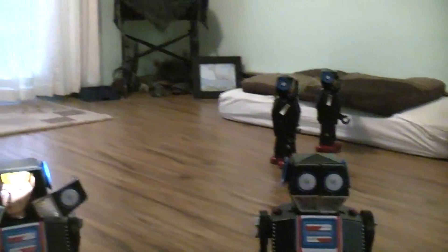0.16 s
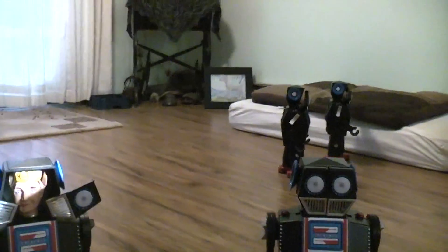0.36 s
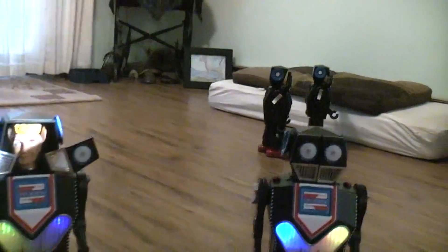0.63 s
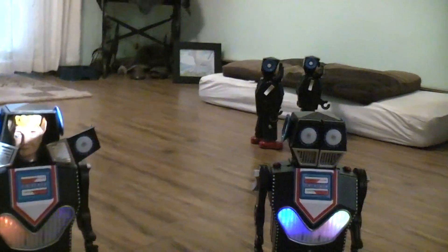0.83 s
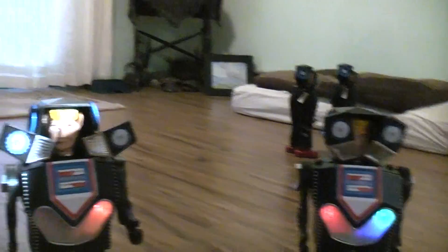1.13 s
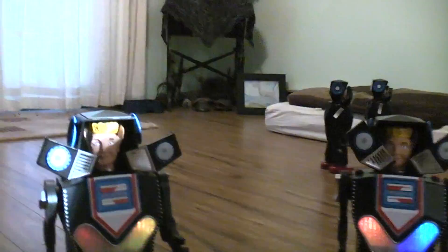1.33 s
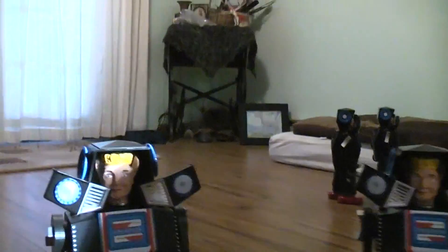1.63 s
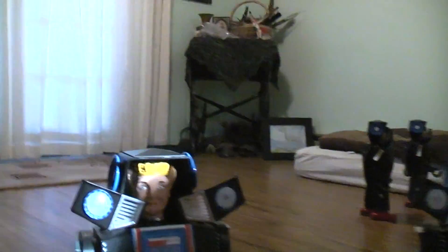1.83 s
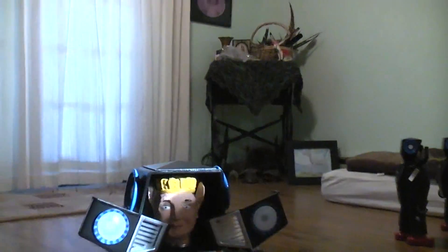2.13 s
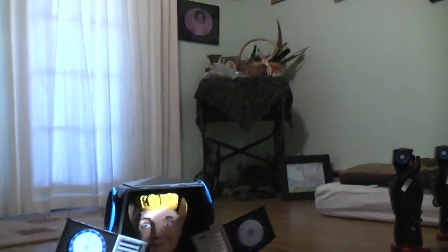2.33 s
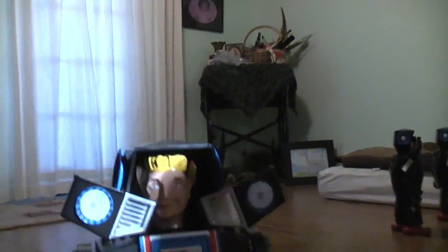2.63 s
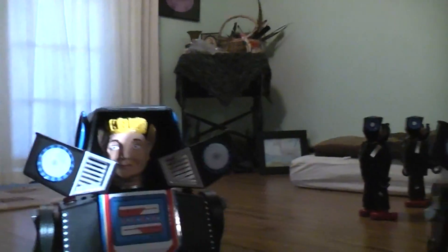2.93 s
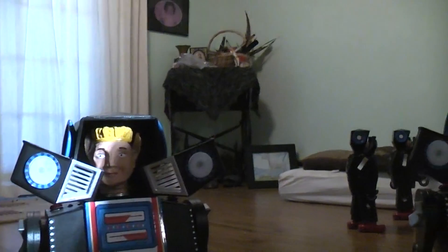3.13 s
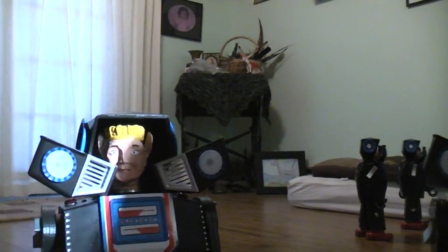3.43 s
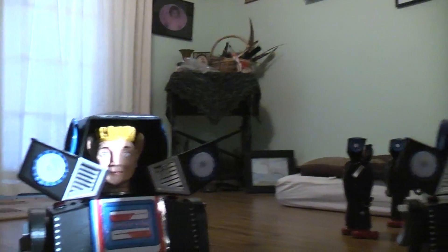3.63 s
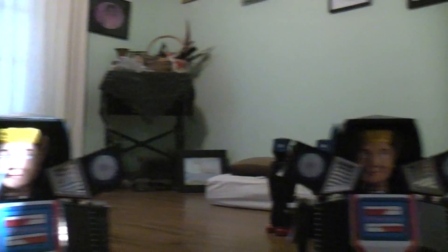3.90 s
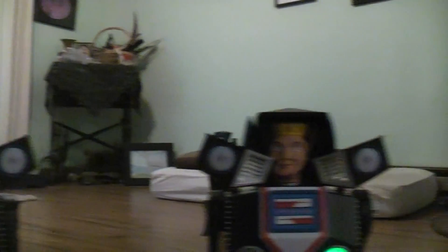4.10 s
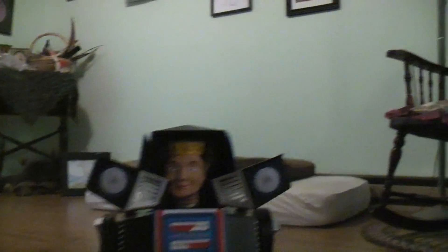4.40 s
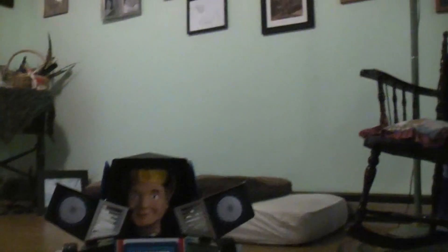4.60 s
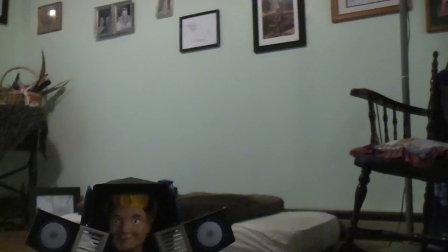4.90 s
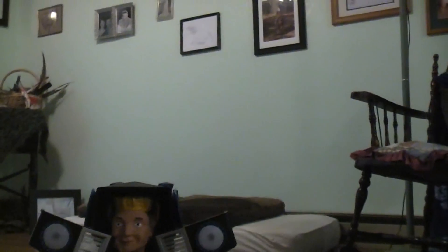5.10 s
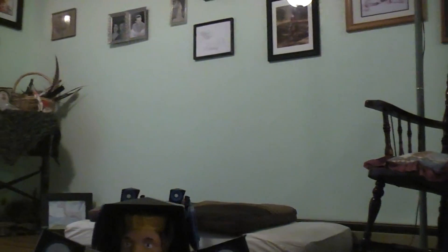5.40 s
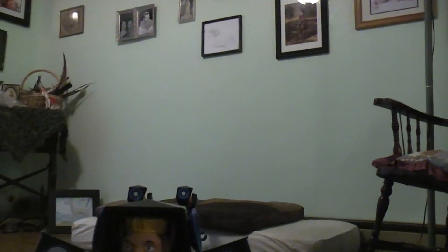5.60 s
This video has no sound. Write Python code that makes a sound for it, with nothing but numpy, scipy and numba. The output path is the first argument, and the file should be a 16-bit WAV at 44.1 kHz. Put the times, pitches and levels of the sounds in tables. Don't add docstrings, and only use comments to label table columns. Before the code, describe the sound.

Several battery-powered toy robots walk on a wooden floor, close to a hand-held stereo microphone in a furnished room. Dense, noisy plastic gear rattle fills the whole stretch of almost six seconds, midrange-heavy with a hissy top, ringing hollow shells. It starts moderate and eases during the first 0.9 s, with crisp knocks near 0.2 and 0.7 s. Around 0.95 s a clear hollow foot thud lands and the rattle grows louder and closer. Further knocks come near 1.5 and 2.0 s, where the gears briefly labour and quieten. Panel tones swell and fade with each stride; from about 3 s boards drone more noticeably, with soft footfalls near 3.2 and 3.4 s. A quick cluster of clacks comes around 3.8 s, more near 4.5 s, and a last one at 5.4 s with low thumps. The clatter ends at its loudest and brightest, over faint motor hum, room rumble and handling bumps.

```python
import sys
import numpy as np
from scipy import signal
from scipy.fft import rfft, irfft, next_fast_len
from scipy.io import wavfile
from scipy.ndimage import uniform_filter1d
from numba import njit

SR = 44100
rng = np.random.default_rng(int(sys.argv[2]) if len(sys.argv) > 2 else 0)


def field_ratio(decibels):
    return 10 ** (np.asarray(decibels, dtype=float) / 20)


def output_pcm(signal):
    pcm = np.clip(np.atleast_2d(signal).T, -1, 1) * 32767
    wavfile.write(sys.argv[1], SR, np.round(pcm).astype(np.int16))


N = 253575
TIME = np.arange(N) / SR
BINS_HZ = np.arange(N // 2 + 1) * SR / N


def shape(points, hz):
    f, db = np.transpose(points)
    return field_ratio(np.interp(np.log(hz + 1), np.log(f), db))


def unit(x):
    return x / np.sqrt(np.mean(x ** 2))


def walk(rate):
    hold = int(SR / rate)
    steps = np.repeat(rng.standard_normal(N // hold + 1), hold)[:N]
    return unit(uniform_filter1d(uniform_filter1d(steps, hold), hold))


@njit
def svf(x, hz, width):
    y, band, low = np.empty(len(x)), 0., 0.
    for i in range(len(x)):
        g, k = np.tan(np.pi * hz[i] / SR), width / hz[i]
        v = (band + g * (x[i] - low)) / (1 + g * (g + k))
        band, low, y[i] = 2 * v - band, low + 2 * g * v, k * v
    return y


def robots():
    # (time [s], level [dB], brightness [dB per octave])
    effort = [(0, -24.6, -.1), (.12, -26.8, -.5), (.3, -27.6, -.45), (.55, -28.1, .55), (.92, -28.9, .25),
              (.96, -25.2, -.15), (1.3, -22.9, .05), (1.9, -23.1, .15), (2.3, -22.1, 0), (2.55, -22.7, .05),
              (2.7, -21.9, .05), (2.95, -23.5, -.1), (3.3, -21.3, -.3), (3.75, -21.9, -.3),
              (4.3, -23.1, .05), (4.9, -22.4, .3), (5.2, -21.4, -.1), (5.75, -20.2, .6)]
    drive = walls(teeth())
    stall_db = stalls()
    rattle = shells(drive, effort, stall_db)
    rattle = rattle / np.sqrt(np.mean(rattle[0] ** 2)) * field_ratio(0.01)
    wobble = 1 + .003 * walk(6)
    ringing = panels(drive, wobble, stall_db) + boards(drive, wobble, stall_db)
    s, level_db, _ = np.transpose(effort)
    return (rattle + ringing) * field_ratio(np.interp(TIME, s, level_db))


def teeth(scatter_db=2.0, jolt_db=0.18, snag_db=0.62, knock_s=0.0013, knock_db=18):
    # (time [s], peak [dB])
    knocks = [(0.1845, -7), (0.303, -29), (0.7074, -7), (1.5164, -9), (1.5994, -29), (2.0074, -10),
              (2.8274, -22), (3.7823, -7), (3.8224, -12), (3.8644, -8), (4.3916, -18), (4.4917, -14),
              (4.5684, -12), (4.8784, -31), (5.381, -10)]
    size = np.minimum(rng.exponential(size=(2, N)), 4.3)
    hits = unit(rng.standard_normal((2, N)) * field_ratio(scatter_db * size))
    hits = hits * field_ratio(jolt_db * walk(14) + snag_db * walk(110))
    tail = np.arange(300) / SR
    for t, db in knocks:
        crack = np.sign(rng.standard_normal((2, len(tail)))) * np.exp(-tail / knock_s)
        start = int(t * SR)
        hits[:, start:start + len(tail)] += field_ratio(db + knock_db) * crack
    return hits


def walls(x, t60_s=0.33, wet_db=-10.5, gap_s=0.0032):
    hop = SR // 3
    t = np.arange(hop) / SR
    fade = np.sin(np.pi * np.arange(2 * hop) / (2 * hop))
    padded = np.pad(x, ((0, 0), (hop, 2 * hop)))
    out = np.pad(padded, ((0, 0), (0, 2 * hop)))
    for a in range(0, N + hop, hop):
        echoes = rng.standard_normal((2, len(t))) * np.exp(-np.log(1000) * t / t60_s) * (t > gap_s)
        echoes = field_ratio(wet_db) * echoes / np.sqrt(np.sum(echoes ** 2, axis=1, keepdims=True))
        wet = signal.fftconvolve(padded[:, a:a + 2 * hop] * fade, echoes, axes=1)
        out[:, a:a + wet.shape[1]] += wet
    return out[:, hop:hop + N]


def stalls():
    # (centre time [s], length [s], loss [dB])
    dips = [(0.618, 0.6, 2.5), (1.565, 0.32, 1.5), (2.046, 0.45, 3.5), (2.6, 0.19, 2.5), (3.98, 0.52, 2.5),
            (4.75, 0.52, 1)]
    loss_db = np.zeros(N)
    for t, length, db in dips:
        loss_db += db * np.cos(np.pi * np.clip((TIME - t) / length, -.5, .5)) ** 2
    return -loss_db


def geared(hz, from_hz=980):
    return 1 / (1 + (from_hz / hz) ** 4)


def shells(drive, effort, stall_db, patchy_db=.75, flicker_db=0.74, pivot_hz=2000):
    # (frequency [Hz], level [dB per Hz])
    rattle = [(150, -53), (250, -27.5), (440, -6), (600, -3), (830, -12), (1150, -5.5), (3400, -6),
              (6000, -6.5), (6500, -10), (8400, -12.5), (10000, -19.5), (11500, -22), (12000, -27),
              (15800, -31.5)]
    # (frequency [Hz], width [Hz], level [dB])
    modes = [(625, 50, -2), (540, 50, -4), (1175, 150, -1), (1830, 120, -6), (2750, 250, -3),
             (3900, 300, -2), (4600, 250, -4), (5900, 350, -6), (7100, 400, -6), (9280, 250, -4),
             (13050, 400, -3)]
    # (frequency [Hz], extra level [dB per dB of level])
    nearness = [(300, 0), (600, 0.2), (1200, -0.22), (3000, -0.05), (8000, -0.09), (14000, 0.07)]
    s, level_db, bright_db = np.transpose(effort)
    near_hz, share = np.transpose(nearness)
    size = next_fast_len(N)
    hz = np.arange(size // 2 + 1) * SR / size
    ring = sum(field_ratio(2 * db) / (1 + (2 * (hz - f) / w) ** 2) for f, w, db in modes)
    spectrum = rfft(drive, size) * shape(rattle, hz) * np.sqrt(1 + ring)
    octave = np.log2(hz + 1)
    out = np.zeros((2, N))
    for centre in np.arange(8, 14.2, .2):
        mask = np.cos(np.pi / 2 * np.clip((octave - centre) / .2, -1, 1)) ** 2
        near = np.interp(centre, np.log2(near_hz), share)
        lean_db = near * (level_db - np.mean(level_db)) + bright_db * (centre - np.log2(pivot_hz))
        db = np.interp(TIME, s, lean_db) + geared(2 ** centre) * stall_db
        db = db + patchy_db * walk(4.13) + flicker_db * walk(16)
        out += field_ratio(db) * irfft(spectrum * mask, size)[:, :N]
    return out


def resonate(drive, table, q, wobble, stall_db, chatter_db=0.5, ring_db=-4.5, widest_hz=228):
    out = np.zeros((2, N))
    for t0, length, part_hz, db in table:
        a, b = max(int(t0 * SR), 0), min(int((t0 + length) * SR), N)
        width = min(part_hz / q, widest_hz)
        glide = part_hz * wobble[a:b]
        part = np.array([svf(svf(d[a:b], glide, 1.2 * width), glide, 2.5 * width) for d in drive])
        stall = stall_db[a:b]
        part = unit(part * field_ratio(geared(part_hz) * (stall - stall.mean())))
        chatter = field_ratio(chatter_db * walk(22)[a:b])
        swell = np.sin(np.linspace(0, np.pi, b - a)) ** .45
        out[:, a:b] += field_ratio(db + ring_db) * part * chatter * swell
    return out


def panels(drive, wobble, stall_db):
    # (start time [s], length [s], frequency [Hz], level re rattle [dB])
    strides = [(0, 0.22, 7355, -19), (0, 1.2, 1190, -16), (.05, 0.45, 1860, -10), (.15, .75, 3165, -21),
               (.4, 0.78, 2150, -13.5), (1.17, 0.7, 2750, -6.5), (1.15, .75, 3835, -13),
               (1.3, 0.46, 3230, -11), (1.6, .6, 8070, -18), (2.15, 0.63, 1180, -12.5),
               (2.2, 0.23, 985, -17), (2.446, 0.23, 1840, -16), (3.4, 0.25, 1380, -11),
               (2.65, .3, 4150, -12), (2.65, .35, 5200, -11), (2.94, .5, 3860, -9.7),
               (3.15, 0.71, 2740, -11), (3.4, 0.42, 1160, -15), (3.45, .6, 8385, -17),
               (3.9, 0.9, 1222, -10.5), (4.05, 0.41, 3885, -10), (3.13, .55, 2260, -11.5),
               (4.4, 0.2, 5400, -10), (4.7, .35, 4605, -7), (5.28, 0.13, 4010, -12),
               (4.97, 0.72, 2730, -9.5), (4.92, .26, 4025, -9), (5.05, .7, 4595, -16),
               (5.3, .25, 1340, -18), (5.62, .13, 6840, -28)]
    return resonate(drive, strides, 7.7, wobble, stall_db)


def boards(drive, wobble, stall_db):
    # (start time [s], length [s], frequency [Hz], level re rattle [dB])
    drones = [(0, 1.0, 449, -19), (1.2, .25, 630, -20), (2.65, .35, 595, -22), (3.117, 0.37, 578, -13),
              (3.05, 1, 632, -12.5), (3.1, 0.95, 730, -27), (3.604, 0.67, 533, -20), (4.1, 0.87, 700, -20),
              (4.15, 0.54, 585, -21), (5.08, 0.14, 624, -7), (5.05, 0.56, 890, -19.5),
              (5.3, 0.64, 618, -17), (5.45, 0.26, 512, -10.5)]
    return resonate(drive, drones, 20.6, wobble, stall_db)


def blows(table, push_s):
    out, t = np.zeros(N + SR // 2), np.arange(SR // 2) / SR
    for s, db, hz, t60 in table:
        push = 1 - np.exp(-t / push_s)
        blow = np.sin(2 * np.pi * hz * t) * np.exp(-np.log(1000) * t / t60) * push
        start = int(s * SR)
        out[start:start + len(t)] += field_ratio(db) * blow / abs(blow).max()
    return out[:N]


def feet():
    # (time [s], peak [dB], frequency [Hz], t60 [s])
    landings = [(.954, -32, 267, 0.096), (.954, -35, 322, .08), (.958, -40, 218, .14),
                (.995, -55, 161, .12), (1.495, -44, 156, 0.14), (2.745, -58, 264, 0.071),
                (3.17, -42, 302, 0.089), (3.435, -36.5, 290, 0.085), (5.01, -45, 283, 0.056),
                (5.385, -42, 165, .15), (5.448, -49, 162, 0.14)]
    return blows(landings, push_s=0.0052)


def grip():
    # (time [s], peak [dB], frequency [Hz], t60 [s])
    shifts = [(1.425, -53, 69, .15), (1.5, -58.5, 60, .15), (3.42, -60, 60, .12), (3.62, -47, 60.4, .18),
              (3.675, -56, 79.5, .12), (3.82, -52, 45, .15), (3.91, -53, 44.2, .15), (4.38, -62, 60, .12),
              (5.38, -54, 70.4, .18)]
    return blows(shifts, push_s=.008)


def hum(table, flutter_db):
    out = np.zeros(N)
    for hz, wander, db in table:
        phase = 2 * np.pi * np.cumsum(hz + wander * walk(5)) / SR
        out += np.sqrt(2) * field_ratio(db + flutter_db * walk(14)) * np.sin(phase)
    return out


def motors():
    # (frequency [Hz], wander [Hz], level [dB])
    shafts = [(152, 4.14, -61.5), (226, 7.3, -68.5), (288, 6, -65), (89.5, 2.98, -73)]
    return hum(shafts, flutter_db=1.5)


def mains():
    # (frequency [Hz], wander [Hz], level [dB])
    tones = [(119.5, .3, -63), (60, .2, -79), (30, .2, -80)]
    return hum(tones, flutter_db=-1.5)


def room(level_db=-57):
    # (frequency [Hz], level [dB per Hz])
    rumble_db = [(12, -49), (20, -14), (65, -20), (129, 8.5), (221, 7), (330, 1), (430, 5), (730, -120)]
    rumble = irfft(rfft(rng.standard_normal((2, N))) * shape(rumble_db, BINS_HZ), N)
    return field_ratio(level_db) * unit(rumble)


def scene():
    # (frequency [Hz], side minus mid [dB])
    spread = [(60, 3), (110, -26.5), (200, -7), (380, -19.5), (700, -12.5), (1290, -10), (2380, -8.5),
              (4400, -10.5), (8120, -7.5), (15000, -7)]
    # (time [s], left minus right [dB])
    swing = [(0.0, 1.0), (0.03, 1), (0.85, 1.0), (1.6, -1.5), (1.98, -1), (3.2, -1.5), (4.64, 1.0),
             (5.75, 0)]
    mid, side = robots() + room()
    side = irfft(rfft(side) * shape(spread, BINS_HZ), N)
    low = mains() + motors() + grip()
    mid = mid + feet() + low
    hand = unit(svf(rng.standard_normal(N), np.full(N, 50.), 60.))
    side = side - .15 * low + field_ratio(-66) * hand
    pan_db = np.interp(TIME, *np.transpose(swing))
    return np.array([mid + side, mid - side]) * field_ratio(np.array([pan_db, -pan_db]) / 2)


def band_limit(x):
    return signal.sosfilt(signal.butter(12, 16780, fs=SR, output="sos"), x)


def record(dry):
    rounded = np.tanh(1.6 * dry) / 1.6
    finished = irfft(rfft(rounded) * (BINS_HZ < 15770), N)
    return band_limit(finished)


dry = scene()
out = record(dry)
output_pcm(out)
```